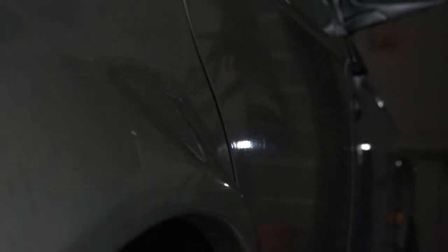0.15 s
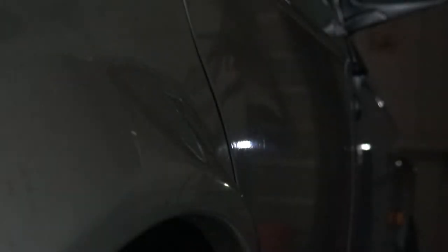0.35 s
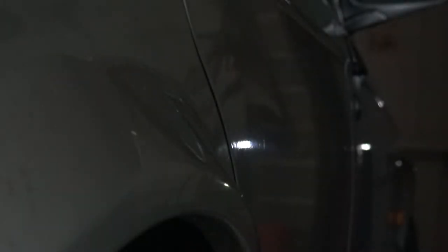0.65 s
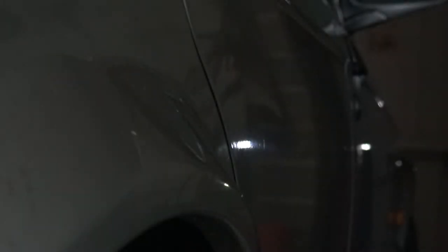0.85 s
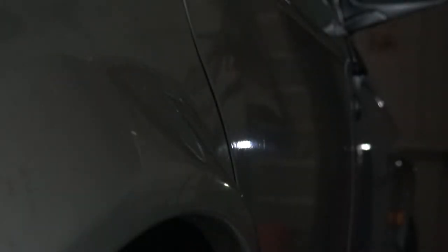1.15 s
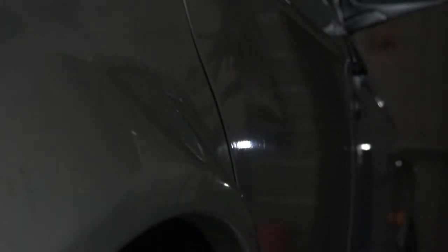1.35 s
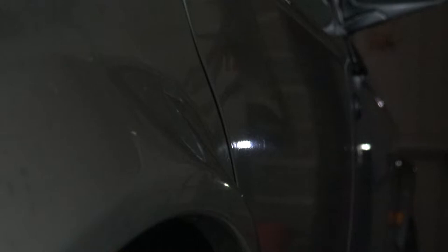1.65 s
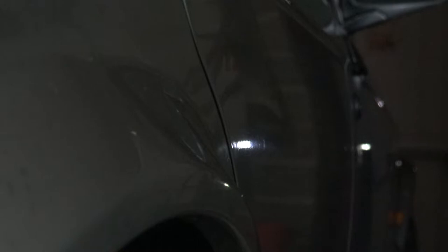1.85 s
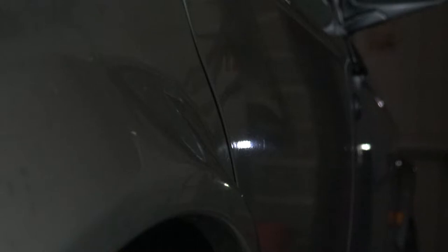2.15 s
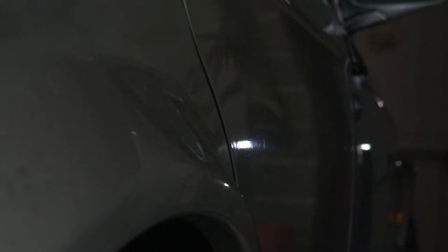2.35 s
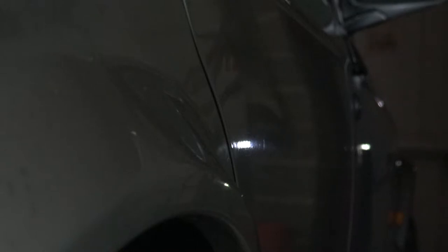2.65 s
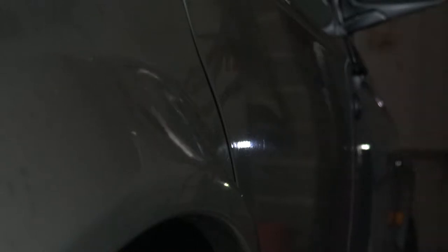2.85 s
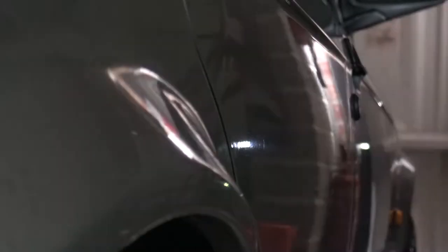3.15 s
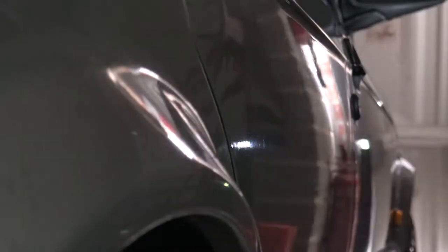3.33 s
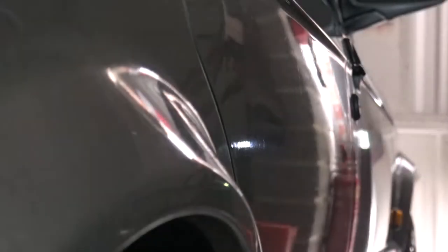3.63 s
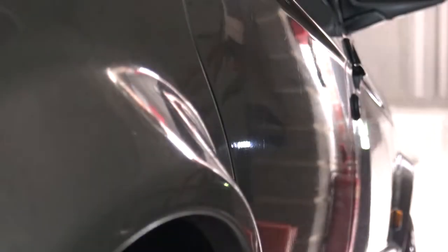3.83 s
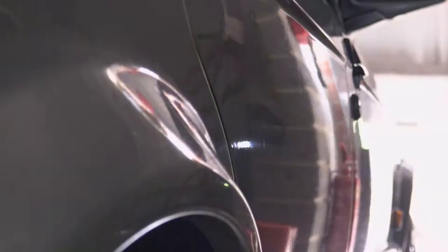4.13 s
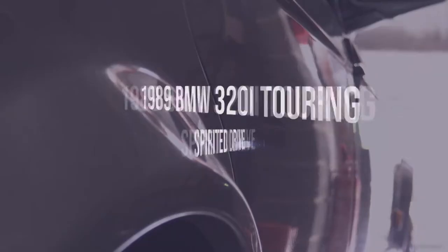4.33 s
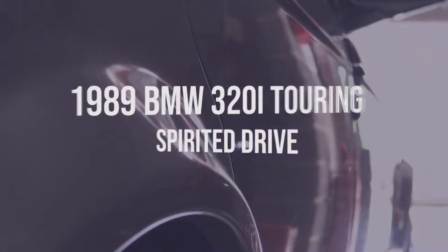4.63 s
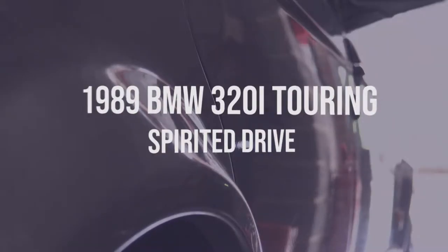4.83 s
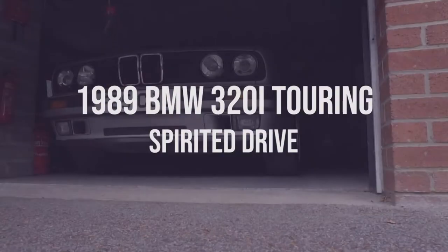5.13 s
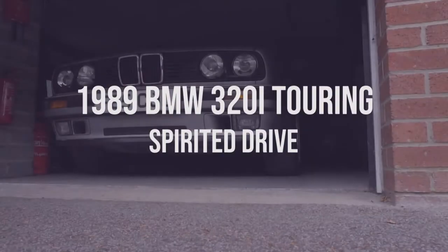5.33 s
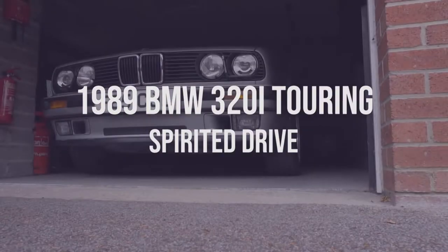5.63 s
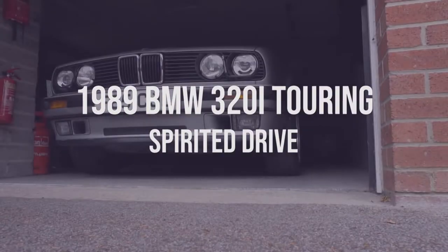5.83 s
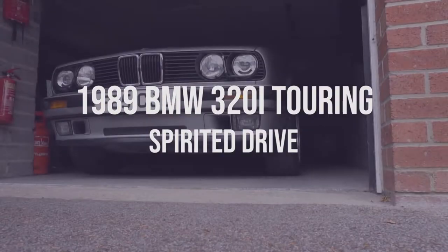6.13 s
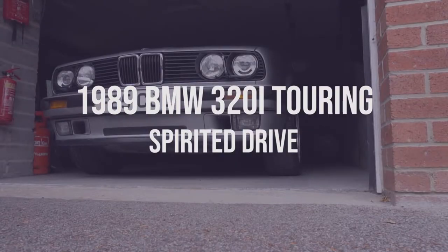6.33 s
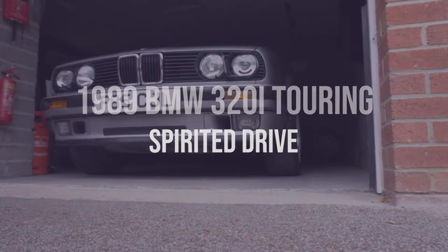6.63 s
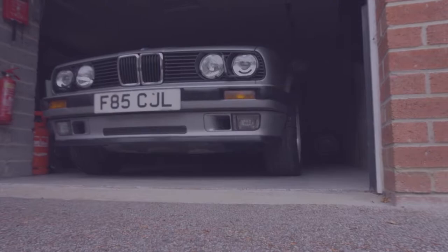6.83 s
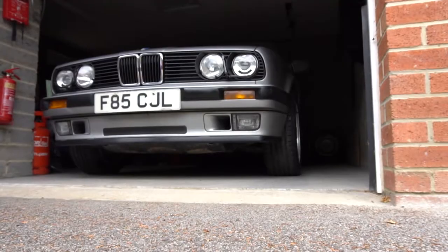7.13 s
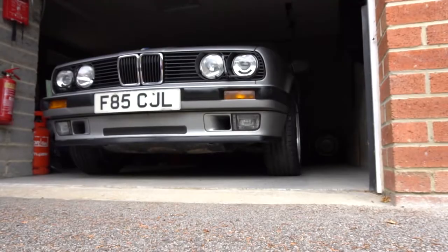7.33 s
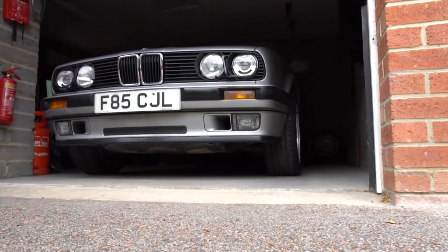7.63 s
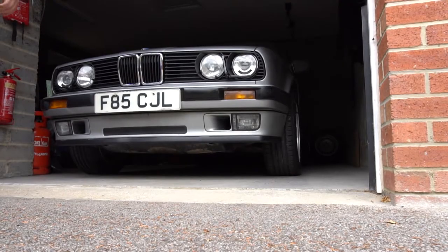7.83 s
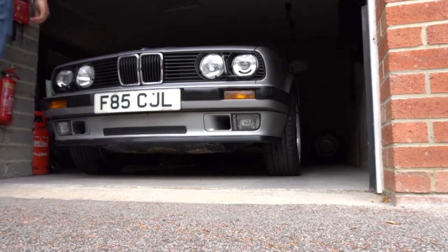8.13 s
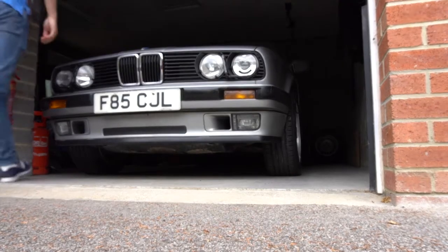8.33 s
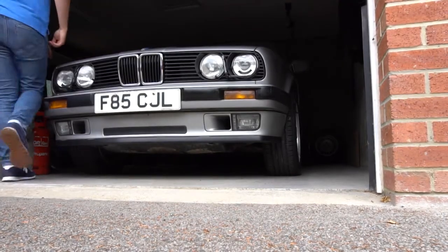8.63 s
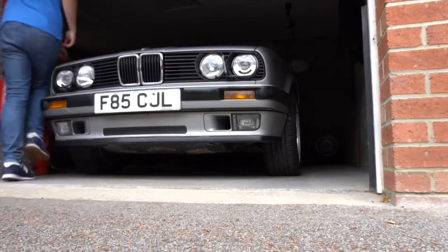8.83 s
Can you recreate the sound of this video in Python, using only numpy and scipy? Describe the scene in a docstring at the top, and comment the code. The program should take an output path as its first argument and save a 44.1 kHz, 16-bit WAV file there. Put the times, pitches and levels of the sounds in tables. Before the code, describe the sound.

Quiet garage air, then a metal garage door clanks loose, booms and rolls open; outside, springs ring out, a songbird whistles and shoes pat tarmac.

```python
"""Inside a brick garage: quiet air and, in the first second or so, far birds; then a steel up-and-over door
is unlatched, shoved free and rolled up its tracks. The scene cuts to the driveway, where the door rattles
on and its springs ring out. After 7.2 s far birds return, a nearby songbird sings a phrase and a few soft
steps cross the tarmac. Blows and rollers are noise shaped by steel and walls, with sines for the ringing
modes; birds are gliding sines with echoes; springs, steps and air are coloured noise."""
import sys
import numpy as np
from scipy import signal
from scipy.fft import rfft, irfft, next_fast_len
from scipy.io import wavfile
from scipy.ndimage import uniform_filter1d, map_coordinates

SR = 44100
rng = np.random.default_rng(int(sys.argv[2]) if len(sys.argv) > 2 else 0)


def log_audio(samples):
    """Write samples as a 16-bit WAV file to the path given in sys.argv[1]."""
    # one column per channel
    frames = np.atleast_2d(samples).T
    # limit to full scale, then quantise
    limited = np.clip(frames, -1, 1)
    pcm = np.round(limited * 32767).astype(np.int16)
    wavfile.write(sys.argv[1], SR, pcm)


N = 395577
TIME = np.arange(N) / SR
CUT = 5.023  # from garage to driveway (s)

# how fast sound dies in the brick garage: pitch_hz, t60_s
GARAGE_DECAY = [(60, .9), (200, 0.49), (500, 0.56), (1300, 0.57), (4000, 0.58), (9000, 0.32), (15000, 0.46)]


def amp(db):
    """Decibels to gain."""
    return 10 ** (np.asarray(db) / 20)


def unit(x):
    """Scaled to rms 1."""
    return x / np.sqrt(np.mean(x ** 2) + 1e-20)


def along(points, hz):
    """(Hz, value) points joined on a log axis."""
    f, v = np.transpose(points)
    return np.interp(np.log(hz + 1), np.log(f + 1), v)


def wobble(rate):
    """A smooth random curve, rate knots a second."""
    knots = rng.standard_normal(int(N * rate / SR) + 4)
    return map_coordinates(knots, [TIME * rate])


def filtered(x, response):
    """x times a response of frequency."""
    n = x.shape[-1]
    m = next_fast_len(n + 8192)
    return irfft(rfft(x, m) * response(np.fft.rfftfreq(m, 1 / SR)), m)[..., :n]


def noise(spectrum, size):
    """Coloured noise of rms 1."""
    return unit(filtered(rng.standard_normal(size), lambda hz: amp(along(spectrum, hz))))


def dying(x, t60s):
    """Each frequency of x dies at its own speed, as between walls."""
    hz, t, z = signal.stft(x, SR, nperseg=256)
    decay = amp(-60 * t / along(t60s, hz)[:, None])
    return signal.istft(z * decay, SR, nperseg=256)[1][:len(x)]


def add(track, s, x):
    """Mix x into the track at s seconds."""
    part = track[max(round(s * SR), 0):][:len(x)]
    part += x[:len(part)]


def spread(x, width, left_db):
    """Two microphone channels: mid plus a smeared side sound; left_db tilts the level to the left."""
    walls = rng.standard_normal(SR // 40) * np.linspace(1, 0, SR // 40)
    smeared = signal.fftconvolve(x, walls / np.linalg.norm(walls))[:N]
    side = filtered(smeared, lambda hz: amp(along(width, hz)))
    return np.array([(x + side) * amp(left_db / 2), (x - side) * amp(-left_db / 2)])


def air(spectrum, db, drift_db):
    """Far traffic and faint hiss: coloured noise whose level drifts."""
    return amp(db + drift_db * wobble(3.3)) * noise(spectrum, N)


def whistle(length, turn, start_hz, turn_hz, end_hz, depth_hz, trill_hz):
    """One note: the pitch eases into a turn and swings out of it, under an arch of loudness."""
    lean, roundness = 1.32, 0.59  # above 1 the note swells late; power of the arch
    t = np.arange(int(length * SR)) / SR
    u, turn = t / length, np.clip(turn, .1, .9)
    into = (start_hz - turn_hz) * (1 - u / turn) ** 2
    out_of = (end_hz - turn_hz) * ((u - turn) / (1 - turn)) ** 2
    hz = turn_hz + np.where(u < turn, into, out_of) + depth_hz * np.sin(2 * np.pi * trill_hz * t)
    arch = np.sin(np.pi * u ** lean) ** roundness
    return np.sqrt(2) * arch * np.sin(2 * np.pi * np.cumsum(hz) / SR)


def birds(notes, trill_hz, flutter_db, direct_db, street_db, near_walls):
    """Gliding whistles, some trilled, scattered by house walls and the street."""
    # decay of the street's echo: pitch_hz, t60_s
    street_decay = [(1500, 0.65), (3000, 1.66), (8000, 0.65)]
    song, echo, t = np.zeros(N), np.zeros(N), np.arange(SR) / SR
    for s, length, turn, start_hz, turn_hz, end_hz, db, depth_hz in notes:
        add(song, s, amp(db) * whistle(length, turn, start_hz, turn_hz, end_hz, depth_hz, trill_hz))
    song *= amp(flutter_db * wobble(70))
    for path in range(4):
        tail = dying(rng.standard_normal(SR), street_decay) * (1 + near_walls * np.exp(-t / 0.045))
        scattered = signal.fftconvolve(song, tail / np.linalg.norm(tail))[:N]
        # each echo path swells and fades at random, so the tail stays smooth
        echo += scattered * (1 + 0.47 * wobble(35)) / 2
    return amp(direct_db) * song + amp(street_db) * echo


def far_birds():
    """Distant whistles in the first second or so and again after 7.2 s, equal in both channels."""
    # notes, levels before the distance gains:
    # start_s, length_s, turn_place (0-1), start_hz, turn_hz, end_hz, level_db, trill_depth_hz
    notes = [(.005, .05, 0.4, 1590, 1600, 1560, -63, 48), (.075, 0.098, 0.84, 3350, 3470, 3480, -67, 110),
             (.12, .12, 0.88, 2400, 1420, 1380, -63, 80), (.245, 0.17, .85, 1200, 1980, 1980, -64, 70),
             (.42, 0.27, 0.44, 2530, 2640, 2590, -64.5, 0), (.48, .25, 0.6, 6490, 6430, 6380, -76, 40),
             (.55, .16, 0.4, 3810, 3800, 3800, -74, 0), (.885, 0.097, 0.6, 3880, 4030, 4200, -64, 70),
             (1.15, .06, .5, 4400, 4380, 4250, -72, 60), (7.2, .17, .5, 2080, 2030, 1970, -76, 100),
             (7.35, .1, 0.63, 3150, 2980, 2950, -77, 45), (7.84, .14, 0.6, 2620, 2540, 2540, -78, 33)]
    return birds(notes, trill_hz=54.7, flutter_db=0.5, direct_db=-7.0, street_db=-6.5, near_walls=4.5)


def tang(x, depth_db, spacing_hz):
    """Each spot of the steel favours its own resonances: random peaks and dips along the spectrum."""
    peaks = rng.standard_normal(1000)
    place = np.arange(len(peaks))
    return filtered(x, lambda hz: amp(depth_db * np.interp(hz / spacing_hz, place, peaks)))


def registers(x, boom, steel, low_hz=330, high_hz=3600):
    """The door's three voices, rms 1 each: the flexing panel, the clanging sheet, the bright contact."""
    def above(hz, edge):
        return 1 / np.sqrt(1 + (edge / (hz + 1)) ** 8)

    def below(hz, edge):
        return 1 / np.sqrt(1 + (hz / edge) ** 8)

    voices = filtered(x, lambda hz: np.array([
        amp(along(boom, hz)) * below(hz, low_hz),
        amp(along(steel, hz)) * above(hz, low_hz) * below(hz, high_hz),
        amp(along(steel, hz)) * above(hz, high_hz)]))
    return [unit(v) for v in voices]


def ringing(modes, t60, t):
    """Decaying modes, struck at new strengths each time; rms 1 before the decay."""
    ring = sum(amp(db + rng.normal(0, 4)) * np.sin(2 * np.pi * (hz * t + rng.random())) for hz, db in modes)
    return unit(ring) * amp(-60 * t / t60)


def knocks(rows, boom, steel, modes, boom_db, clang_db, click_db, ring_db, ring_t60, rise, direct, tang_db):
    """Each blow shakes the whole door; its dense modes and the brick walls draw it out."""
    out, t, head = np.zeros(N), np.arange(SR) / SR, SR // 12
    first = 1 + direct * np.exp(-t / 0.016)  # direct sound and near walls stand above the tail
    for s, db, low_db, high_db in rows:
        low, clang, click = registers(rng.standard_normal(SR), boom, steel)
        clang = tang(clang, tang_db, spacing_hz=45.35)
        click = tang(click, tang_db, spacing_hz=109.1)
        voices = [dying(v, GARAGE_DECAY) for v in (low, clang, click)]
        low, clang, click = [v / np.std(v[:head]) for v in voices]
        clang = clang + amp(ring_db) * ringing(modes, ring_t60, t)
        # each voice rises at its own speed, the heavy panel slowest
        blow = amp(high_db + click_db) * click * first * (1 - np.exp(-t / 0.0029))
        blow += amp(clang_db) * clang * first * (1 - np.exp(-t / rise))
        blow += amp(low_db + boom_db) * low * (1 - np.exp(-t / 0.0087))
        add(out, s, amp(db) * blow)
    return out


def flexing(shoves, t60):
    """The big sheet wobbles in its lowest modes after each shove."""
    # lowest bending modes, relative levels: pitch_hz, level_db
    bending = [(37.7, -35), (70.0, -32.5), (118.4, -36)]
    out, t = np.zeros(N), np.arange(SR) / SR
    for s, db, _ in shoves:
        add(out, s, amp(db) * ringing(bending, t60, t) * (1 - np.exp(-t / 0.017)))
    return out


def shaking(effort, start, shoves, grows, t60):
    """Gain of one part of the door: rolling feeds it, shoves kick it, and it dies away in t60 seconds."""
    times, levels = np.transpose(effort)
    effort_db, usual_db = np.interp(TIME, times, levels), np.mean(levels)
    moving = (TIME > start) & (TIME < times[-1])
    drive = moving * amp(usual_db + grows * (effort_db - usual_db)) ** 2
    keep = amp(-60 / (t60 * SR)) ** 2  # power left after one sample
    power = signal.lfilter([1 - keep], [1, -keep], drive)
    for s, _, db in shoves:
        age = np.maximum(TIME - s, 0)
        power = power + (amp(db - 60 * age / t60) * (1 - np.exp(-age / .008))) ** 2
    return np.sqrt(power)


def rolling(effort, start, shoves, answer, boom, steel, rate, tang_db):
    """Rollers bump over grit: small uneven jolts, rate a second each, through door and garage."""
    t = np.arange(SR // 2) / SR
    shaken = np.zeros(N)
    for roller in range(3):
        jolts = (rng.random(N) < rate / SR) * rng.uniform(-0.92, 1, N)
        jolts = jolts * amp(3 * wobble(9))  # the load shifts between rollers
        response = dying(tang(rng.standard_normal(len(t)), tang_db, spacing_hz=70.2), GARAGE_DECAY)
        response = response * (1 + 2.8 * np.exp(-t / 0.015))  # near walls answer first
        shaken += signal.fftconvolve(jolts, response)[:N]
    _, rattle, scrape = registers(shaken, boom, steel)
    rumble = registers(rng.standard_normal(N), boom, steel)[0]
    out = np.zeros(N)
    for voice, (db, grows, t60) in zip((rumble, rattle, scrape), answer):
        # level the voice over a sixth of a second, so the shaking sets its loudness
        steady = voice / np.sqrt(np.abs(uniform_filter1d(voice ** 2, SR // 6)) + 1e-9)
        out += amp(db) * shaking(effort, start, shoves, grows, t60) * steady
    return out


def stay_arm(start, db, t60):
    """A loose steel arm clashes brightly as the door tips over: a burst of coloured noise."""
    # colour of the clash: pitch_hz, level_db_per_hz (relative)
    clash = [(1470, -33), (2500, -10), (2850, -9), (3240, -1), (4140, -9), (4820, 2), (5050, 0),
             (5410, -11.5), (5790, -11), (6300, -17), (6850, -12), (8950, -6), (10100, -16), (14500, -40.5),
             (15500, -38.5)]
    out, t = np.zeros(N), np.arange(SR // 2) / SR
    add(out, start, amp(db - 60 * t / t60) * (1 - np.exp(-t / 0.0018)) * noise(clash, len(t)))
    return out


def door_from_inside():
    """Latch, shoves and rollers heard within the brick walls."""
    # blows of latch, panel and rollers, before the voices' gains:
    # start_s, clang_db, boom_db (re clang), click_db (re clang)
    blows = [(2.09, -25.0, -20, -25), (2.206, -30.0, -11.5, -3.5), (2.277, -17, -11, -11.5),
             (2.284, -9.5, -24.5, -10), (2.484, -28, -9.5, -11.5), (2.778, -20.5, -17.5, -0.5),
             (2.844, -15.0, -21.5, -4), (2.918, -7, -7.5, -14.5), (2.95, -10.5, -4.5, -9.5),
             (3.05, -9.5, -8.0, -13.0), (3.19, -18, -3.0, -12.5), (3.261, -17, -6.5, -20.0),
             (3.397, -20.0, -11.0, -15.5), (3.459, -28.5, -14.5, 2), (3.565, -26.5, -9, -14.5),
             (3.998, -31, -23, -16.5), (4.097, -31.5, -26, -10.5), (4.285, -13.0, -21.0, -24.5),
             (4.455, -30, -14.5, -14), (4.591, -26.5, -20.0, -20.5), (4.868, -20.5, -5.5, -16),
             (4.945, -16.5, -11.5, -30.5)]
    # colour of blows and of rolling, low then high, relative: pitch_hz, level_db_per_hz
    blow_boom = [(15, -47), (26, -22.5), (39, -5), (50, -21), (63, 1.5), (72, 4.5), (92, -5.5), (120, -1.5),
                 (165, -5), (250, -9.5), (400, -17.5), (880, -62.5)]
    blow_steel = [(150, -30), (250, 5.5), (318, -5), (385, -4), (507, -8.5), (669, -3.5), (781, -4),
                  (1220, 1.5), (1920, -6.5), (2530, -10.5), (2710, -15), (3160, -13), (3630, -16.5),
                  (8320, -18.5), (15500, -34)]
    roll_boom = [(15, -37.5), (28, -5), (41, 3), (52, 3), (75, 3), (110, -7), (165, 2), (215, -2),
                 (280, -3.5), (400, -6.5), (880, -48.5)]
    roll_steel = [(150, -31), (250, 6), (427, -3), (466, 1.5), (534, 0), (809, -4), (978, 1.5),
                  (1160, -5.5), (1250, -2.5), (1380, -3.5), (2020, -12.5), (3390, -20), (5500, -23.5),
                  (8770, -24.5), (15500, -39.5)]
    # sheet-steel modes, relative levels: pitch_hz, level_db
    panel_modes = [(387.6, -50.5), (559.9, -49), (662.1, -46.5), (742.9, -51), (1238, -42), (1550, -54),
                   (2121, -52), (2557, -50.5), (2998, -56)]
    # shoves that bend the whole panel and set the door shuddering: start_s, bending_db, shudder_db
    shoves = [(2.291, -26, -33.5), (2.598, -35, -51.5), (2.935, -20.5, -21.5), (3.051, -26.5, -32)]
    # how hard the rollers run in the tracks: time_s, effort_db
    effort = [(2.7, -41.5), (3.0, -36.5), (3.45, -46.5), (3.8, -46.5), (4.05, -39), (4.3, -41),
              (4.8, -41.5), (4.93, -35.5), (5.02, -44)]
    # rows are panel rumble, rattle, scrape: level_db (re effort), growth (dB per dB of effort), t60_s
    answer = [(2.1, .85, 1.5), (1, 1.3, .95), (-12.5, 1.23, 1.05)]
    door = knocks(blows, blow_boom, blow_steel, panel_modes, boom_db=-8.0, clang_db=-13, click_db=-9.5,
                  ring_db=-11, ring_t60=0.5, rise=0.0047, direct=0.16, tang_db=3.5)
    door += flexing(shoves, t60=0.89)
    door += rolling(effort, 2.7, shoves, answer, roll_boom, roll_steel, rate=220, tang_db=2)
    return door + stay_arm(start=3.459, db=-27, t60=0.32)


def springs(start, db, t60):
    """The lifting springs' crowded modes sing on after the door comes to rest: peaky, fading noise."""
    # colour of the springs: pitch_hz, level_db_per_hz (relative)
    spring_colour = [(1350, -59), (2300, -26), (2440, -19), (2490, -8), (2750, 10), (2850, 0), (2990, -18),
                     (3110, -18), (3630, -23), (3840, -11), (4620, -8), (4870, -14), (5320, -15),
                     (5860, -32), (7000, -30), (9100, -60), (15400, -120)]
    out, t = np.zeros(N), np.arange(SR) / SR
    ring = unit(tang(noise(spring_colour, SR), depth_db=5, spacing_hz=34.76))
    add(out, start, amp(db - 60 * t / t60) * ring * (1 - t))
    return out


def door_from_driveway():
    """Blows, rollers and ringing springs heard from outside."""
    # blows, before the voices' gains: start_s, clang_db, boom_db (re clang), click_db (re clang)
    blows = [(5.144, -42.5, -12, -7.5), (5.23, -34.5, -8, -12), (5.429, -36, 0, -12.5),
             (5.618, -34.5, -22, -18.5), (5.714, -33, -3, -14), (5.833, -42, -1, -7),
             (5.896, -28.5, -18, -16), (5.991, -32, -18, -18.5), (6.064, -30.5, -9, -15),
             (6.175, -28.5, -18, -16), (6.421, -37, 1, -7), (6.517, -36, 2, -8), (6.66, -44.5, 6, -13)]
    # colour of the door, low then high, relative: pitch_hz, level_db_per_hz
    boom = [(13, -45), (22, -17), (60, -6.5), (97, 5.5), (146, -3), (173, -15), (205, -0.5), (243, -8.5),
            (278, -12.5), (359, -27), (400, -11.5), (520, -39), (880, -120)]
    steel = [(150, -7), (270, 11.5), (360, 2), (450, -4), (560, -10), (670, -0.5), (780, -2), (980, 3),
             (1250, 0.5), (1600, -5), (2100, -11.5), (3100, -15.5), (4200, -26.5), (5200, -24),
             (8800, -27.5), (15500, -43)]
    # modes of tracks and frame, relative levels: pitch_hz, level_db
    frame_modes = [(667.5, -59), (952.8, -43), (1610, -77), (1992, -57), (2121, -59), (2342, -77),
                   (3106, -68), (4323, -101), (4883, -60), (6255, -80), (6740, -66), (6988, -73),
                   (7741, -91), (8780, -82), (9625, -105), (10056, -79)]
    # how hard the rollers run in the tracks: time_s, effort_db
    effort = [(5.023, -52), (5.3, -50.5), (5.62, -47.0), (5.8, -42.0), (6.1, -39), (6.28, -41.0),
              (6.42, -50.0), (6.62, -55)]
    # rows are panel rumble, rattle, scrape: level_db (re effort), growth (dB per dB of effort), t60_s
    answer = [(3, 1, 1.85), (-0.5, 0.82, 0.2), (-15.5, 1.6, .14)]
    door = knocks(blows, boom, steel, frame_modes, boom_db=-23, clang_db=-16.0, click_db=-11.5,
                  ring_db=-3.5, ring_t60=0.38, rise=0.0021, direct=2.0, tang_db=7.0)
    door += rolling(effort, CUT, [], answer, boom, steel, rate=120, tang_db=1.0)
    return door + springs(start=6.72, db=-70.5, t60=1.6)


def near_bird():
    """A songbird close by sings one phrase of gliding whistles, some trilled."""
    # notes, levels before the distance gains:
    # start_s, length_s, turn_place (0-1), start_hz, turn_hz, end_hz, level_db, trill_depth_hz
    notes = [(7.355, 0.19, .7, 1970, 2145, 2040, -57.5, 110),
             (7.495, 0.096, .45, 2180, 1922, 2400, -49.5, 25), (7.65, .025, 0.65, 2350, 2560, 2480, -63, 0),
             (7.672, .066, .45, 2410, 2226, 2090, -48, 3.5), (7.825, .11, 0.65, 1566, 1819, 1700, -54, 10),
             (7.925, 0.044, 0.51, 1750, 1703, 1630, -55, 50),
             (8.015, .16, .35, 2030, 2120, 1990, -47.5, 153), (8.235, .035, .7, 2620, 2910, 2850, -64, 0),
             (8.252, .17, .68, 2930, 2305, 3120, -44.5, 0), (8.41, 0.059, 0.47, 2940, 3060, 3100, -63, 58)]
    return birds(notes, trill_hz=58.4, flutter_db=0.0, direct_db=-4.0, street_db=-7.5, near_walls=7.0)


def steps(db):
    """Soft soles pat the tarmac: short bursts of dull noise."""
    # footfalls, levels before the gain db: start_s, level_db, t60_s
    footfalls = [(7.798, -49, 0.17), (7.825, -56, 0.12), (8.474, -52, 0.11), (8.704, -55.5, 0.25),
                 (8.838, -60.5, 0.18)]
    # colour of sole on tarmac: pitch_hz, level_db_per_hz (relative)
    sole = [(60, -20), (150, 9.5), (550, 5), (900, -9), (1600, -9.5), (4000, -24), (12000, -46)]
    out, t = np.zeros(N), np.arange(SR // 2) / SR
    for s, level_db, t60 in footfalls:
        add(out, s, amp(db + level_db - 60 * t / t60) * (1 - np.exp(-t / 0.0046)) * noise(sole, len(t)))
    return out


def garage_side():
    """Stereo microphones inside the garage: the door and the enclosed air."""
    # colour of the garage air: pitch_hz, level_db_per_hz (relative)
    air_colour = [(12, -28.5), (20, -3.5), (59, 4), (98, -8), (185, -4.5), (219, -12), (427, -17),
                  (725, -20), (906, -10.5), (1200, -21.5), (2270, -25), (2610, -26), (2840, -26),
                  (4070, -27.5), (15500, -31.5)]
    # stereo width of the door, then of the air: pitch_hz, side_db (re mid)
    door_width = [(60, -24), (110, -27.5), (200, -23.5), (380, -17), (700, -17.5), (1290, -30.5),
                  (2380, -33.5), (4400, -33.5), (8120, -12), (15000, -31.5)]
    air_width = [(60, -23.5), (110, -17.5), (200, -11), (380, -7), (700, -11), (1290, -14), (2380, -18),
                 (4400, -16.5), (8120, -1.5), (15000, -16.5)]
    door = spread(door_from_inside(), door_width, left_db=.5)
    return door + spread(air(air_colour, db=-58.5, drift_db=.5), air_width, left_db=0)


def driveway_side():
    """Stereo microphones on the driveway: door, steps and open air, the near bird towards the left."""
    # colour of the outdoor air: pitch_hz, level_db_per_hz (relative)
    air_colour = [(12, -36), (20, -4.5), (87, 4), (175, -6.5), (245, -3.5), (352, -14), (549, -11),
                  (1300, -29), (2330, -25), (3450, -31.5), (15500, -48.5)]
    # stereo width outdoors: pitch_hz, side_db (re mid)
    open_width = [(60, -44), (110, -72), (200, -31), (380, -16.5), (700, -12.5), (1290, -11.5), (2380, -8),
                  (4400, -4), (8120, -5), (15000, -2)]
    outside = door_from_driveway() + steps(db=-4.5) + air(air_colour, db=-70, drift_db=1.2)
    return spread(outside, open_width, left_db=.4) + spread(near_bird(), open_width, left_db=5.2)


def scene():
    """Inside the garage until the cut, then out on the driveway; far birds early and late."""
    after = np.clip((TIME - CUT) / .002 + .5, 0, 1)  # a 2 ms crossfade
    return garage_side() * (1 - after) + driveway_side() * after + far_birds()


def record(dry):
    """The microphone signal keeps nothing above its band limit of 15.8 kHz."""
    return filtered(dry, lambda hz: hz < 15800)


dry = scene()
out = record(dry)
log_audio(out)
```